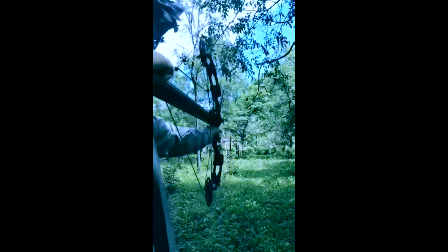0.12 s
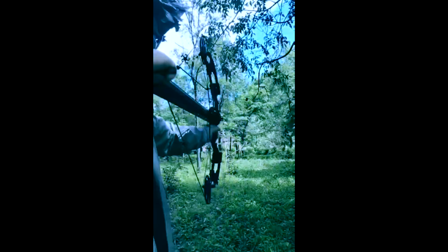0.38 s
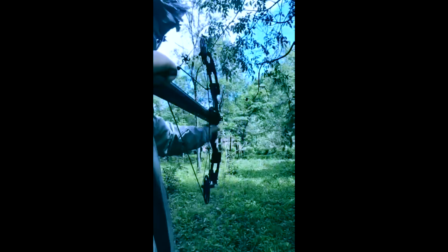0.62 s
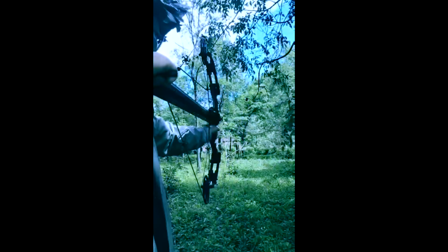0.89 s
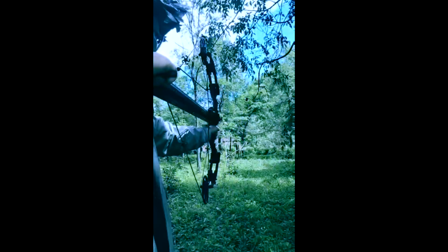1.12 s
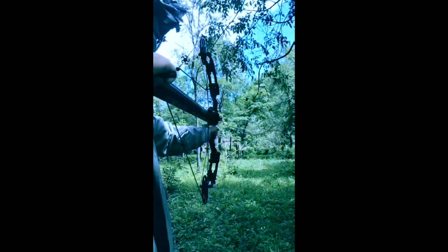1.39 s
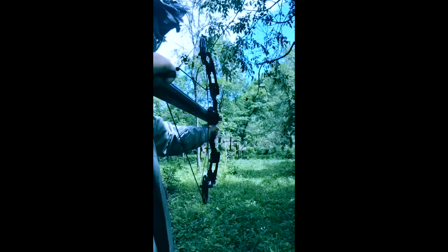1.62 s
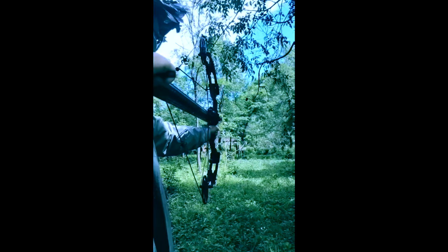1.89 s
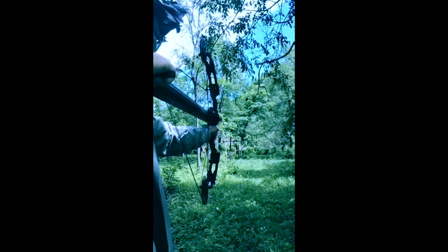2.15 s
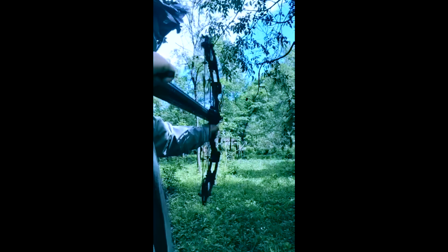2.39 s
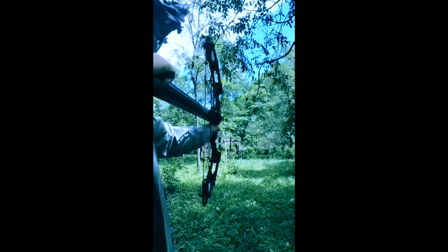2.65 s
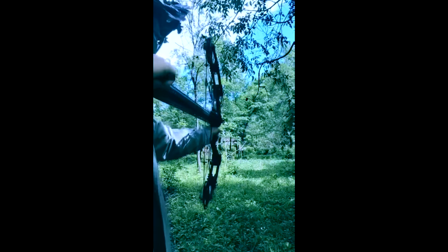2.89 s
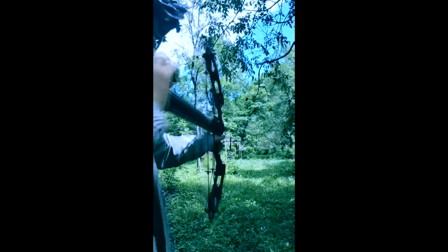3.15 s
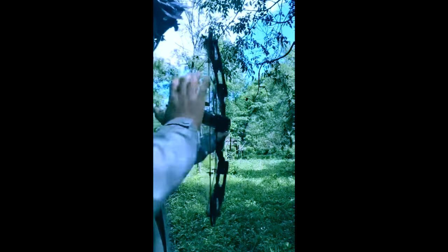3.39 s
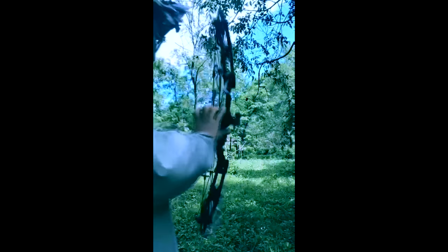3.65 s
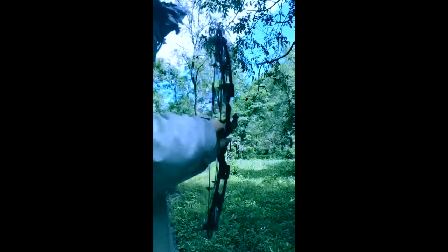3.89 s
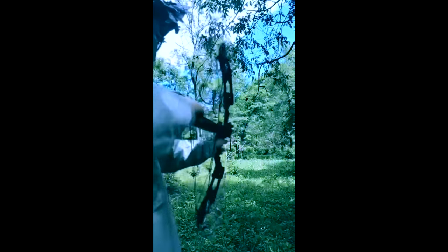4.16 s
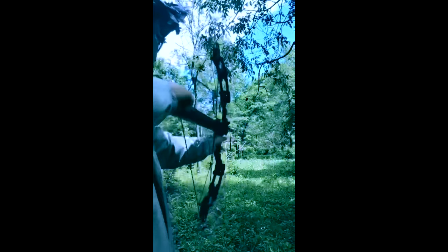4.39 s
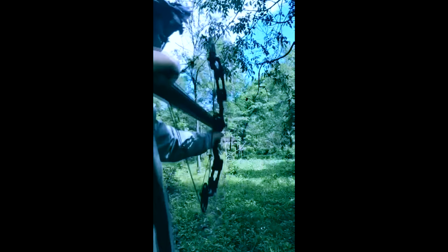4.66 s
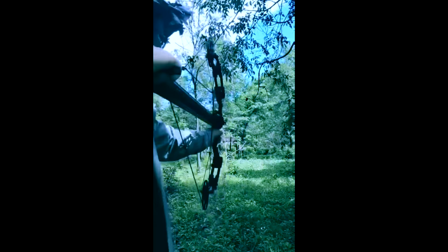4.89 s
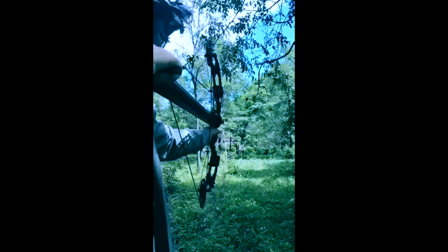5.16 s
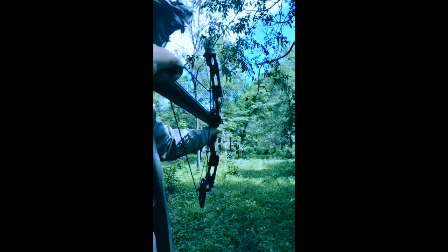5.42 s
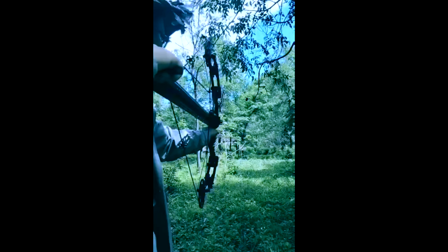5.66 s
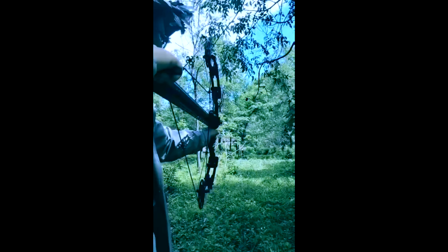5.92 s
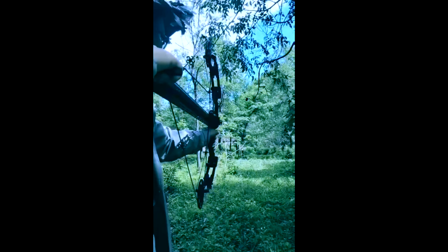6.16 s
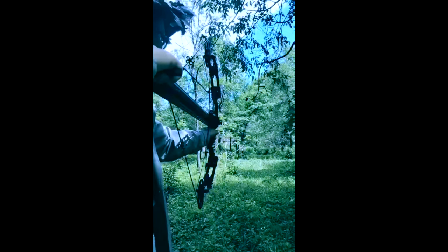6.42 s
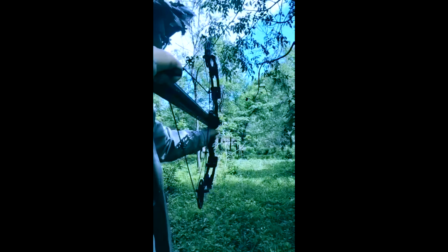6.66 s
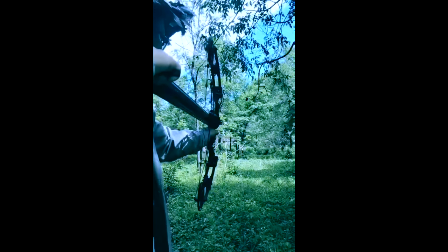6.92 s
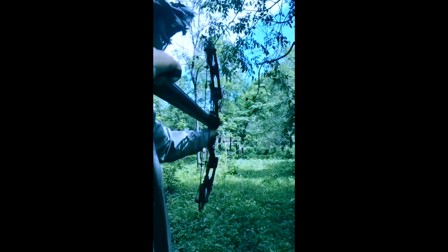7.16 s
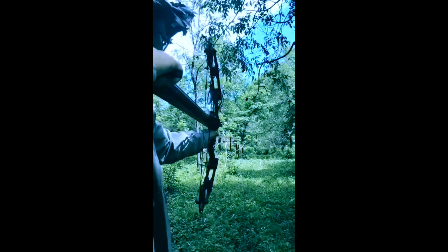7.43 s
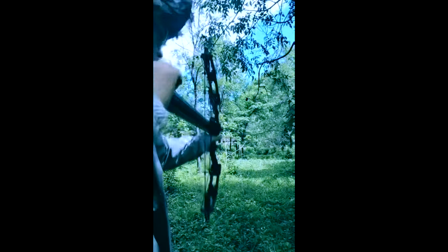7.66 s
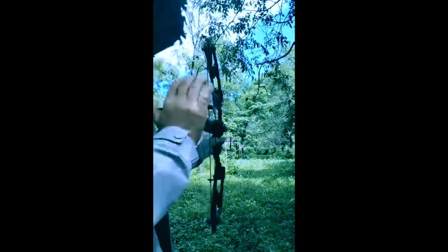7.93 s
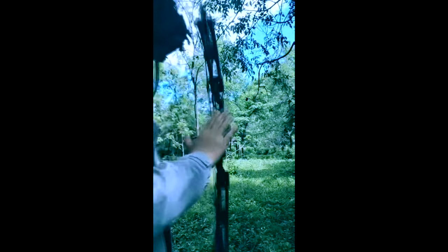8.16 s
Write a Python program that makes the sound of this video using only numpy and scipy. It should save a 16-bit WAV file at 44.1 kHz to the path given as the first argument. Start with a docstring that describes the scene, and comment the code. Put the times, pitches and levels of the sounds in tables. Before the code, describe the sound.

Sharp bow snap with rattling metal, distant ball strike, rising slide scrape and hard slams, then a second shot, over faint birds and traffic.

```python
"""A metallic clack dies away at once, then small birds whistle faintly over far traffic in a wood.
A step from the microphone a compound bow with a steel-ball launcher tube is shot twice: latch and
balls clatter as bursts of grit that ring metal modes, and the string thumps home in the limbs' modes.
The ball cracks on a far target and trees scatter the echo as decaying noise; then the slide is racked,
a rising rush of stick-slip noise in the tube's resonances. Near sounds are alike in both channels."""
import sys
import numpy as np
from scipy import signal
from scipy.fft import rfft, irfft
from scipy.io import wavfile
from scipy.ndimage import uniform_filter1d

SR = 44100
rng = np.random.default_rng(int(sys.argv[2]) if len(sys.argv) > 2 else 0)


def transcribe(u):
    """Save the signal u as a 16-bit wav file named by the first command-line argument.

    u: samples, shape (n,) or (channels, n), limited to [-1, 1]; the rate is SR.
    q: integer samples, one column per channel.
    """
    v = np.clip(np.atleast_2d(u).T, -1, 1)
    q = np.round(v * 32767).astype(np.int16)
    wavfile.write(sys.argv[1], SR, q)


def ratio_of_db(decibels):
    """Turn decibels (scalar or array-like) into linear amplitude factors; 0 dB maps to 1."""
    return 10 ** (np.asarray(decibels, float) / 20)


N = 366030
T = np.arange(N) / SR

# background of the wood, relative spectrum: f/Hz, level/dB
WOOD_COLOUR = [(12, -48.5), (20, -14.5), (70, -1), (90, -0.5), (109, -9), (191, -7.5), (232, -13.5),
               (289, -11.5), (811, -18), (985, -20), (1100, -23), (3450, -38), (5690, -38.5),
               (15500, -50.5)]
# far traffic rumble swelling and sinking: t/s, level/dB
RUMBLE = [(0, -57), (1.9, -57), (4.7, -55.5), (5.2, -62.5), (5.6, -59), (8.3, -57)]
LEAVES_DB = -60

# clear bird whistles: t/s, length/s, start f/Hz, end f/Hz, relative level/dB
WHISTLES = [(0.34, 0.041, 4200, 4150, -75), (.56, .06, 3680, 3700, -70), (0.623, 0.12, 3520, 3360, -74),
            (1.769, 0.047, 4090, 4020, -74), (1.81, 0.072, 3670, 3700, -75), (1.83, 0.033, 3250, 3250, -74),
            (1.98, .18, 3850, 3490, -78), (5.17, 0.19, 4540, 4800, -77), (5.33, 0.034, 4610, 3600, -73),
            (5.39, 0.186, 4380, 4340, -75.5), (5.389, 0.046, 3260, 3340, -71.5),
            (5.56, 0.072, 4300, 3520, -74.5), (6.331, 0.085, 3486, 3460, -72.5),
            (6.371, .05, 5800, 5100, -66.5), (6.605, 0.093, 3770, 3500, -69.5)]
# blurred chatter of further birds: t/s, length/s, middle f/Hz, relative level/dB
CHATTER = [(0.197, 0.614, 3300, -81), (.45, 0.27, 4500, -80.5), (1.599, .5, 3750, -87),
           (5.566, 0.25, 4250, -79), (5.629, 0.17, 3240, -76.5), (5.83, 0.2, 4600, -83),
           (6.206, 0.3, 4185, -79), (6.219, 0.19, 3260, -75.5), (6.384, .2, 5330, -82),
           (6.46, .22, 3350, -79)]
WHISTLE_WAVER, CHIRP_WAVER = .011, .035  # shares of the pitch
CHIRP_S, CHIRPS_PER_S = .04, 80
CHIRP_SPREAD, CHIRP_GLIDE = .1, .1  # largest shift either way, shares of the pitch
TWITTER_DB = -91.5

# decay of the echo among the trees, stretched for each use: f/Hz, relative t60/s
ECHO_T60 = [(100, 0.33), (700, 1.65), (3000, 0.87), (8000, 0.55), (14000, 0.65)]
CLUMP_DB = 2.2  # unevenness of the echo

# ball on the far target: t/s, relative blow/dB, relative echo/dB, shaken leaves level/dB, leaves t60/s
IMPACTS = [(2.443, -2.5, -20.5, -35.5, 0.59), (6.9712, -4, -24.5, -24, 0.19)]
# modes of the struck target: f/Hz, relative level/dB, t60/s
TARGET_MODES = [(125, -22.5, 0.12), (174, -18, 0.083), (264.5, -11.5, 0.027), (743, -3.5, 0.042),
                (1078, -4.5, 0.028), (2600, -1, 0.019), (4300, 1.5, 0.0059)]
# colour of the wood's answer: f/Hz, relative level/dB
ECHO_COLOUR = [(47, -43.5), (80, -13), (145, -0.5), (275, -10), (709, -4.5), (1010, -9.5), (1180, -6),
               (1470, -8), (2970, -6.5), (3240, -6.5), (7170, -7), (13300, -30), (15500, -38)]
# colour of the foliage round the target: f/Hz, relative level/dB
RUSTLE_COLOUR = [(500, -28), (1500, -8.5), (3500, -0.5), (7500, -1), (10000, -8), (13500, -7.5),
                 (15500, -33.5)]
# single strong returns from near trunks: t/s, relative level/dB
TRUNKS = [(2.4705, -11), (2.4742, -13.5), (2.534, -20), (2.563, -23.5), (2.599, -18.5), (2.70, -25.5),
          (7.004, -26), (7.034, -16), (7.092, -20)]
LEAVES_SETTLE = 1.5  # exponent over 1: the rustle holds, then drops

# slide rubbing softly between the actions, one list a stroke: t/s, relative level/dB
SOFT_STROKES = [
    [(2.99, -51), (3.14, -66), (3.25, -59.5)],
    [(3.84, -65), (3.88, -60), (3.96, -59.5), (4.04, -51.5), (4.2, -57.5), (4.3, -68.5), (4.44, -65),
     (4.55, -54)],
    [(7.43, -66.5), (7.58, -64), (7.6, -60), (7.75, -58.5)],
    [(8.23, -54.5), (8.26, -60.5), (8.3, -56)],
]
# slide racked forward until it slams: start t/s, slam t/s, relative start level/dB, relative slam level/dB
RACKS = [(3.255, 3.491, -51, -34), (7.747, 8.036, -52.5, -36)]
# resonances of the launcher tube: f/Hz, width/Hz, relative level/dB
TUBE = [(1005.5, 390, -3), (3040, 860, -5.7), (4300, 610, -10), (1880, 2000, -7), (447.4, 300, -15),
        (10800, 1700, -24)]
# hiss over the rubbing: f/Hz, relative level/dB
HISS_COLOUR = [(4500, -32), (5400, -4), (6600, -4), (7400, 0.5), (8100, -10), (8600, -33.5)]
HISS_DB = -10.5  # relative to the tube's resonances
SPURT_S, SPURT_DB = .035, 4.5  # the slide lurches: this rise in level just before the slam

# shots: latch lets go t/s, relative level/dB, extra lift over 8 kHz/dB
SHOTS = [(2.1754, -1, 0), (6.6981, 0.5, 0.5)]
# modes of the bow's limbs: f/Hz, relative level/dB, t60/s
LIMB_MODES = [(75, -5, .12), (150, 4, .07), (243, -5, 0.054), (380, 2, .04), (620, 6.5, 0.034),
              (1000, -15, .03)]
# limbs knock when the string is caught: t/s, peak level/dB
COCKING_THUMPS = [(4.565, -35)]
STRING_HOME_S, THUMP_DB = .0255, -15.5  # after the latch; relative to the shot

# loud clacks of racking and cocking: t/s, peak level/dB, lift under 1.6 kHz/dB, lift over 8 kHz/dB, t60/s
CLACKS = [(0, -14, -9, -9.5, 0.08), (3.499, -2, -6, -8.5, .04), (3.616, -17.5, 7, -18.5, 0.067),
          (3.624, -5.5, 2, 1.5, 0.035), (3.7829, -13.5, -14, -6.5, .045), (4.5597, -12, 10, -2.5, 0.054),
          (4.586, -9, -2.5, 0, .03), (4.629, -19.5, 1.5, -5, 0.048), (8.0457, -11.5, 9, -1.5, 0.029),
          (8.0597, 1, -4, -4, .043), (8.117, -12, 0, -12.5, 0.082), (8.13, -15.5, -9, -8, .065)]
# clacks of every shot, latch then string coming home: t after the latch/s, peak level relative to the
# shot/dB, lift under 1.6 kHz/dB, lift over 8 kHz relative to the shot/dB, t60/s
SHOT_CLACKS = [(-.0035, -26.5, -9, -3.5, 0.028), (0, -8, -0.5, 0, 0.03), (0.023, -7, 15.5, 4.5, .05),
               (.028, -3, 0, 4, .065)]
# loose parts round the clacks: t/s, length/s, first level/dB, last level/dB,
# lift under 1.6 kHz/dB, lift over 8 kHz/dB (levels before the scatter)
RATTLES = [(.015, .03, -25, -32.5, -5, -5.5), (3.478, .02, -25.5, -9, -3, -1.5),
           (3.504, .026, -8.5, -16, 0.5, -1.5), (3.535, .06, -21.5, -26, 1.5, -6),
           (3.63, 0.032, -13.5, -22, -3, -1), (3.788, 0.0067, -24, -24, -3, -4.5),
           (4.572, .016, -17.5, -9.5, -7.5, -9), (4.588, .022, -12.5, -24.5, 0, -3.5),
           (8.002, .04, -28.5, -25, -2, -1.5), (8.05, .006, -9.5, -9, -4.5, -21),
           (8.067, .025, -7.5, -20, 0.5, -9.5), (8.14, .006, -33.5, -15.5, -1, -5)]
# rattles of every shot, carriage flying then parts settling: t after the latch/s, length/s,
# first and last level relative to the shot/dB, lift under 1.6 kHz/dB, relative lift over 8 kHz/dB
SHOT_RATTLES = [(.006, 0.015, -11.5, -11.5, -3.5, -4), (0.04, 0.059, -11.5, -16, -2.5, 1)]
# dull ticks that ring one part clearly: t/s, peak level/dB, lift under 1.6 kHz/dB, t60/s, ring f/Hz
TICKS = [(2.241, -23, -14, 0.11, 4773), (2.266, -26.5, -2.5, 0.11, 3440), (2.913, -33, -1, 0.0083, 2604),
         (2.973, -24.5, 25.5, 0.057, 1100), (2.979, -25, 0, 0.023, 3472), (3.029, -40, 16, .015, 1995),
         (3.052, -43, 19, .036, 2339), (3.445, -27.5, -1.5, 0.21, 3460), (3.766, -27.5, 1.5, 0.039, 3440),
         (4.57, -9, -11.5, 0.06, 6540), (4.577, -3, -11.5, 0.038, 6330), (6.787, -16.5, -3, 0.057, 3520),
         (7.4045, -27, 27, 0.023, 1050), (7.411, -30.5, 22, 0.034, 3470), (7.6, -47, 17.5, .04, 4040),
         (7.653, -44, 10.5, 0.024, 920), (8.2009, -12, -22, 0.027, 2480), (8.206, -33.5, 9.5, 0.074, 3600)]
# common colour of the metal contacts: f/Hz, relative level/dB
CLACK_COLOUR = [(120, -44), (200, -21), (293, -21.5), (378, -14.5), (430, -22), (607, -11.5), (1780, -8.5),
                (3420, 0.5), (3890, -3.5), (7350, -2), (8980, -8.5), (13600, -9), (15500, -30)]
# modes of the launcher's metal: f/Hz, relative level/dB, t60/s
METAL = [(2150, -12, .3), (2700, -13, .3), (3350, -12.5, .4), (3500, -9, .25), (3900, -10, .15),
         (4140, -8, .35), (4300, -9, .2), (4760, -6, .2), (5000, -12, .3), (5760, -9, .25), (6250, -4, .15),
         (6800, -8, .18), (7150, -5, .14), (7600, -4, .12), (10900, -8, .1)]
RATTLE_GAP_S, RATTLE_SCATTER_DB, RATTLE_T60_S = .006, 2, .055  # mean gap, scatter either way
SETTLE_DB, SETTLE_T60_S = -3, .16  # the last contact of a falling rattle is softer and drags on
TICK_TOP_DB = -16.5  # lift over 8 kHz
TUBE_SHARE = .35  # share of clack and rattle contacts that strike the tube wall


def on_log_axis(table, hz):
    """Read a (f, value) table along a logarithmic frequency axis."""
    table = np.array(table)
    return np.interp(np.log(np.maximum(hz, 1)), np.log(table[:, 0]), table[:, 1])


def coloured(noise, db):
    """Noise with a gain in dB for each frequency bin, rms 1."""
    y = irfft(rfft(noise) * ratio_of_db(db), noise.shape[-1])
    return y / np.sqrt(np.mean(y ** 2))


def ring(modes, size):
    """Impulse response of a body: a sum of decaying sine modes."""
    t = np.arange(size) / SR
    return sum(ratio_of_db(db) * np.sin(2 * np.pi * hz * t) * ratio_of_db(-60 * t / t60) for hz, db, t60 in modes)


def walk(rate, size=N):
    """Random levels held 1 / rate s and smoothed; spread near 1."""
    hold = max(int(SR / rate), 1)
    steps = np.repeat(rng.standard_normal(size // hold + 1), hold)
    return 1.4 * uniform_filter1d(steps, hold)[:size]


def add(out, x, s):
    """Mix x into out at s seconds."""
    i = max(int(s * SR), 0)
    out[i:i + len(x)] += x[:len(out) - i]


def blows(table, modes, push_s):
    """A short push of the given length rings the modes; each blow peaks at its level in the table."""
    push = np.hanning(int(push_s * SR) + 3)
    sound = np.convolve(ring(modes, 2 ** 14), push)
    out = np.zeros(N)
    for s, db, *_ in table:
        add(out, ratio_of_db(db) * sound / np.abs(sound).max(), s)
    return out


def wood():
    """Far traffic and leaves are shaped noise; the rumble swells slowly and leans to the left."""
    hz = np.fft.rfftfreq(N, 1 / SR)
    db = on_log_axis(WOOD_COLOUR, hz)
    spectrum = rfft(coloured(rng.standard_normal(N), db))
    bass_share = 1 / (1 + (hz / 300) ** 2)
    swell_db = np.interp(T, *np.transpose(RUMBLE)) + .6 * walk(4.2)
    bass = irfft(spectrum * bass_share, N) * ratio_of_db(swell_db)
    leaves = irfft(spectrum * (1 - bass_share), N) * ratio_of_db(LEAVES_DB + 0.27 * walk(4.4))
    side = ratio_of_db(LEAVES_DB - 12.5) * coloured(rng.standard_normal(N), db) + 0.12 * bass
    return bass + leaves + side * np.array([[1], [-1]])


def trees(x, colour_db, stretch, onset_s):
    """Scattered returns from trunks and leaves: octaves of noise, each clumpy and dying at its own rate."""
    size = 2 ** 16
    t, hz = np.arange(size) / SR, np.fft.rfftfreq(size, 1 / SR)
    noise = rfft(coloured(rng.standard_normal(size), colour_db(hz)))
    response = 0
    for centre in 45.0 * 2. ** np.arange(9):
        band = np.clip(1 - np.abs(np.log2(np.maximum(hz, 1) / centre)), 0, 1)
        t60 = stretch * on_log_axis(ECHO_T60, centre)
        response = response + irfft(noise * band) * ratio_of_db(CLUMP_DB * walk(30, size) - 60 * t / t60)
    onset = 1 - np.exp(-(t / onset_s) ** 2)
    return signal.fftconvolve(x, response * onset)[:N]


def birds():
    """Gliding whistles with a wavering pitch and patches of quick chirps, blurred by the trees."""
    out = np.zeros(N)
    notes = [(*row, WHISTLE_WAVER) for row in WHISTLES]
    for s, length, hz, db in CHATTER:
        for when, pitch, glide in rng.random((64, 3))[:int(length * CHIRPS_PER_S)]:
            start = hz * (1 + CHIRP_SPREAD * (2 * pitch - 1))
            end = start * (1 + CHIRP_GLIDE * (2 * glide - 1))
            notes.append((s + when * (length - CHIRP_S), CHIRP_S, start, end, db, CHIRP_WAVER))
    quick, slow, flutter = walk(500), .004 * walk(40), ratio_of_db(3.2 * walk(60))
    # every note reads the random curves from its own place
    for (s, length, hz0, hz1, db, waver), k in zip(notes, rng.integers(0, N - SR, 512)):
        size = int(length * SR)
        hz = np.linspace(hz0, hz1, size) * (1 + waver * quick[k:k + size] + slow[k:k + size])
        envelope = np.sqrt(2 * np.hanning(size)) * flutter[k:k + size]
        add(out, ratio_of_db(db) * envelope * np.sin(2 * np.pi * np.cumsum(hz) / SR), s)
    # more birds far off blur into patchy twitter
    bins = np.fft.rfftfreq(N, 1 / SR)
    for centre in (3220, 3800, 4500, 5040):
        band = coloured(rng.standard_normal(N), -10 * np.log10(1 + ((bins - centre) / 330) ** 4))
        out += band * ratio_of_db(TWITTER_DB + 2.2 * walk(13))
    return out + ratio_of_db(-31) * trees(out, lambda hz: 0 * hz, .45, .02)


def target():
    """A sharp crack and the knock of the far target's modes, then the wood answers with scattered echoes."""
    out, returns = np.zeros(N), np.zeros(N)
    t, hz = np.arange(900) / SR, np.fft.rfftfreq(N, 1 / SR)
    rustle = coloured(rng.standard_normal(N) * ratio_of_db(1.1 * walk(500)), on_log_axis(RUSTLE_COLOUR, hz))
    for s, db, echo_db, leaves_db, leaves_t60 in IMPACTS:
        # the crack: a single smooth pulse nine samples long
        add(out, -ratio_of_db(db) * np.hanning(9), s - 4 / SR)
        # the ball tears through leaves just before it lands
        add(out, ratio_of_db(db - 17.5) * rng.standard_normal(132) * np.linspace(0, 1, 132) ** 2, s - .003)
        add(out, ratio_of_db(db - 19.5) * rng.standard_normal(len(t)) * ratio_of_db(-60 * t / 0.14), s)
        tick = np.zeros(N)
        add(tick, ratio_of_db([echo_db]), s)
        out += trees(tick, lambda hz: on_log_axis(ECHO_COLOUR, hz), 0.77, 0.016)
        # foliage round the target rustles, swelling for a moment and settling quickly
        after = np.maximum(T - s, 0)
        decay = ratio_of_db(leaves_db - 60 * (after / leaves_t60) ** LEAVES_SETTLE)
        out += decay * (1 - np.exp(-after / 0.014)) * rustle
    for s, db in TRUNKS:
        add(returns, ratio_of_db(db - 15.5) * rng.standard_normal(len(t)) * ratio_of_db(-60 * t / 0.016), s)
    returns = signal.fftconvolve(returns, ring(TARGET_MODES, 2048))[:N] * ratio_of_db(-6.5)
    knock = ratio_of_db(-2.0) * blows(IMPACTS, TARGET_MODES, .0001)
    # a small target radiates no deep bass
    return signal.sosfilt(signal.butter(2, 70, "high", fs=SR, output="sos"), out + knock + returns)


def slide():
    """Stick-slip grains in the tube's resonances, with a brighter hiss over them."""
    hz = np.fft.rfftfreq(N, 1 / SR)
    body = 0
    for f, width, db in TUBE:
        grains = rng.standard_normal(N) * ratio_of_db(2.5 * walk(250) + 1.5 * walk(30))
        body = body + ratio_of_db(db) * coloured(grains, -10 * np.log10(1 + (2 * (hz - f) / width) ** 4))
    hiss = coloured(rng.standard_normal(N) * ratio_of_db(1.4 * walk(200)), on_log_axis(HISS_COLOUR, hz))
    rush = body + ratio_of_db(HISS_DB) * hiss
    racked = [[(start, start_db), (slam - SPURT_S, slam_db - SPURT_DB), (slam, slam_db)]
              for start, slam, start_db, slam_db in RACKS]
    out = np.zeros(N)
    for stroke in SOFT_STROKES + racked:
        s, db = np.transpose(stroke)
        on = np.clip(np.minimum(T - s[0], s[-1] + 0.025 - T) / .02, 0, 1)
        out += on * ratio_of_db(np.interp(T, s, db)) * rush
    return out


def limbs():
    """The bow's limbs ring low when the string comes home, and softly when it is caught."""
    thumps = [(s + STRING_HOME_S, THUMP_DB + db) for s, db, _ in SHOTS]
    return blows(thumps + COCKING_THUMPS, LIMB_MODES, .0006)


def contacts():
    """Rows (s, dB, low dB, top dB, t60 s, ring Hz) of every contact; but for ticks, chance picks the part."""
    clacks, rattles = list(CLACKS), list(RATTLES)
    for s, db, top_db in SHOTS:
        for ds, d, low, top, t60 in SHOT_CLACKS:
            clacks.append((s + ds, db + d, low, top_db + top, t60))
        for ds, span, first, last, low, top in SHOT_RATTLES:
            rattles.append((s + ds, span, db + first, db + last, low, top_db + top))
    for s, span, first_db, last_db, low_db, top_db in rattles:
        gap, size = rng.random((2, 16))
        after = np.cumsum(RATTLE_GAP_S * (.5 + gap)) - RATTLE_GAP_S * (.5 + gap[0])
        for a, z in zip(after, size):
            if a < span:
                db = first_db + (last_db - first_db) * a / span + RATTLE_SCATTER_DB * (2 * z - 1)
                clacks.append((s + a, db, low_db, top_db, RATTLE_T60_S))
        if last_db < first_db:
            clacks.append((s + span, last_db + SETTLE_DB, low_db, top_db, SETTLE_T60_S))
    tube_wall = rng.integers(2, 4, 256)  # the third and fourth mode
    other_part = rng.integers(4, len(METAL) - 1, 256)
    part = np.where(rng.random(256) < TUBE_SHARE, tube_wall, other_part)
    struck = [(*row, METAL[k][0]) for row, k in zip(clacks, part)]
    return struck + [(s, db, low, TICK_TOP_DB, t60, hz) for s, db, low, t60, hz in TICKS]


def launcher():
    """Each contact is a gritty burst of tiny collisions; they shake the metal, which rings unevenly."""
    out, size = np.zeros(N), 2 ** 13
    t, hz = np.arange(size) / SR, np.fft.rfftfreq(size, 1 / SR)
    low, top = 1 / (1 + (hz / 1600) ** 6), 1 / (1 + (8200 / np.maximum(hz, 1)) ** 8)
    highest = 1 / (1 + (12500 / np.maximum(hz, 1)) ** 16)
    for s, db, low_db, top_db, t60, ring_hz in contacts():
        grit = rng.standard_normal(size) * ratio_of_db(2.0 * walk(900, size))
        colour = on_log_axis(CLACK_COLOUR, hz) + low * low_db + top * top_db
        # duller clacks lose still more of the highest treble
        colour = colour + min(top_db, 0) * highest
        # the part that is struck rings loudest
        colour = colour + 11 / (1 + ((hz - ring_hz) / 220) ** 2)
        # short blows start at once, longer scrapes swell
        swell = 1 - np.exp(-t / (0.087 * t60 ** 2))
        burst = coloured(grit, colour) * swell * ratio_of_db(-60 * t / t60)
        add(out, ratio_of_db(db) * burst / np.abs(burst).max(), s)
    # loose parts touch and let go, so every mode flutters
    jangle = sum(signal.fftconvolve(out, ring([mode], 2 ** 14))[:N] * walk(130) for mode in METAL)
    # the trees return mostly what lies above 2 kHz
    echo = trees(out, lambda hz: -10 * np.log10(1 + (2000 / np.maximum(hz, 1)) ** 4), 0.46, 0.016)
    return out + ratio_of_db(-50.5) * jangle + ratio_of_db(-46.5) * echo


def scene():
    """Only the wood's background differs between the channels; all else is the same in both."""
    return launcher() + limbs() + target() + slide() + birds() + wood()


def low_pass(x):
    """Removes everything above the highest recorded frequency."""
    return signal.sosfilt(signal.butter(12, 15680, fs=SR, output="sos"), x)


def record(dry):
    """The microphone drops the deepest bass and the top; peaks beyond full scale are clipped."""
    heard = signal.sosfilt(signal.butter(2, 28, "high", fs=SR, output="sos"), dry)
    heard = signal.sosfilt(signal.butter(8, 15300, fs=SR, output="sos"), heard)
    return low_pass(np.clip(heard, -1, 1))


dry = scene()
out = record(dry)
transcribe(out)
```